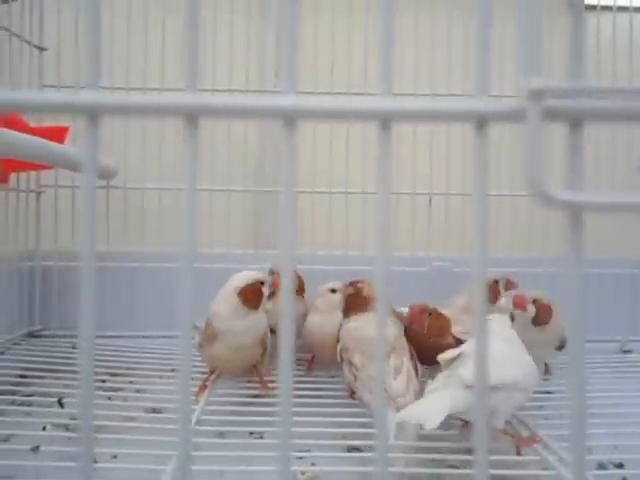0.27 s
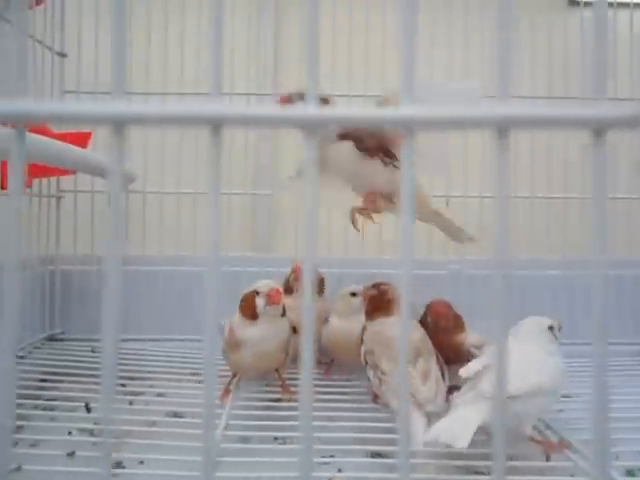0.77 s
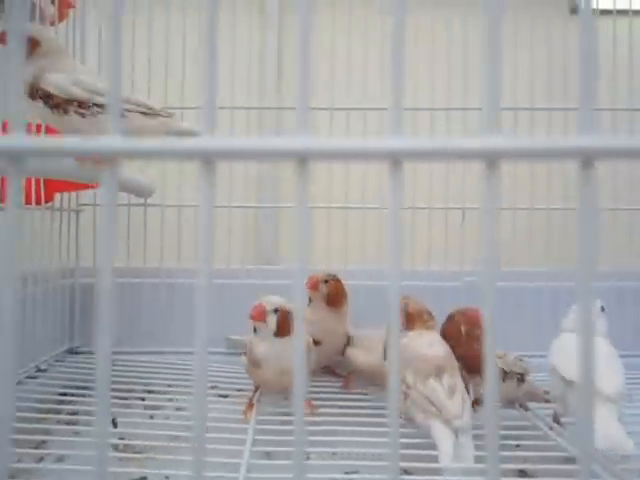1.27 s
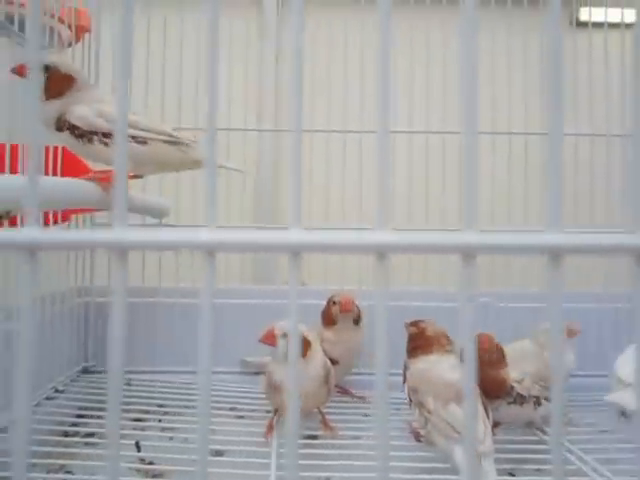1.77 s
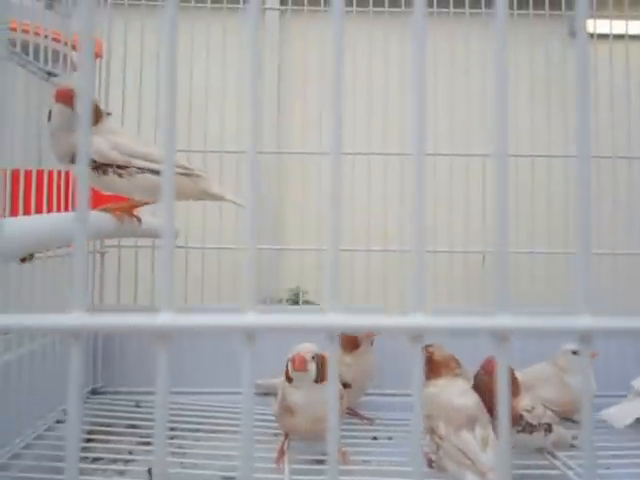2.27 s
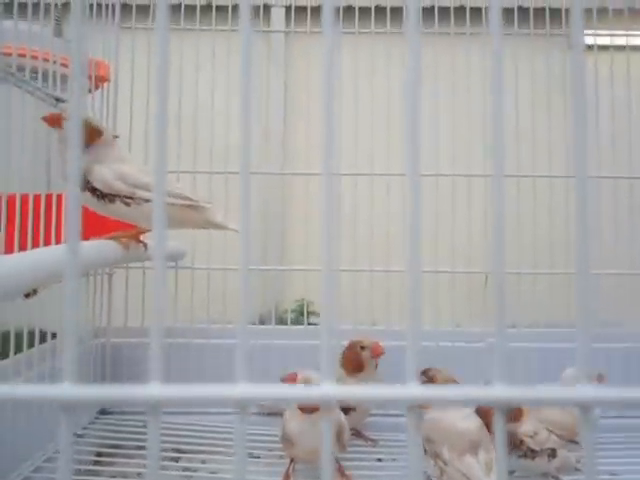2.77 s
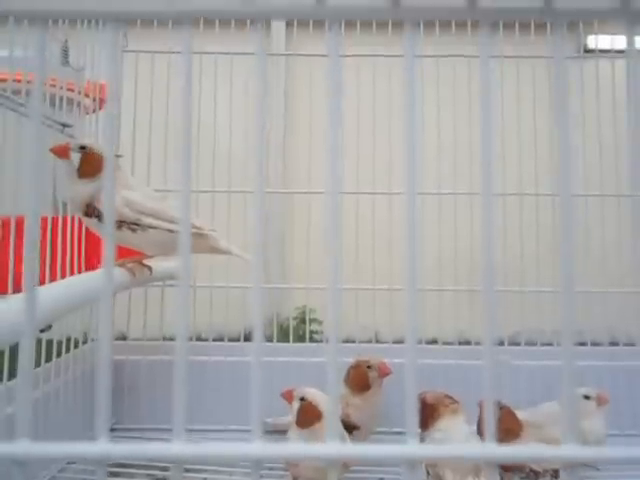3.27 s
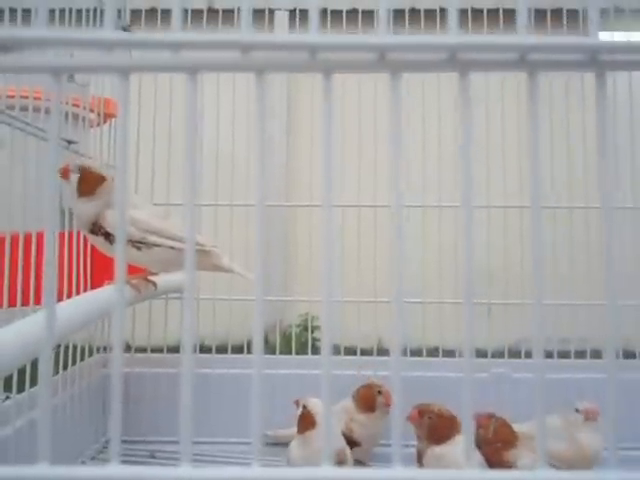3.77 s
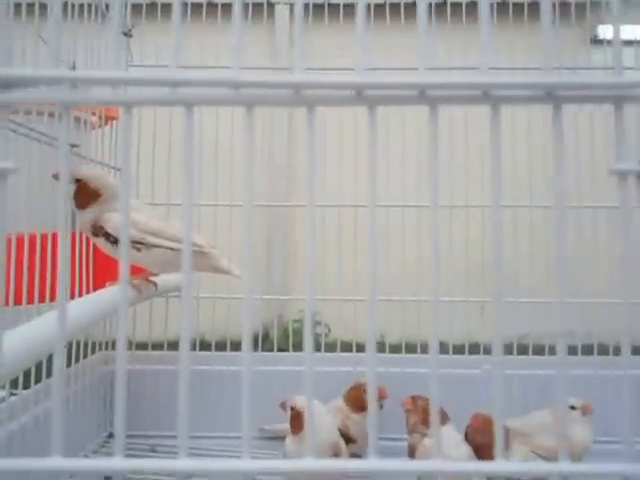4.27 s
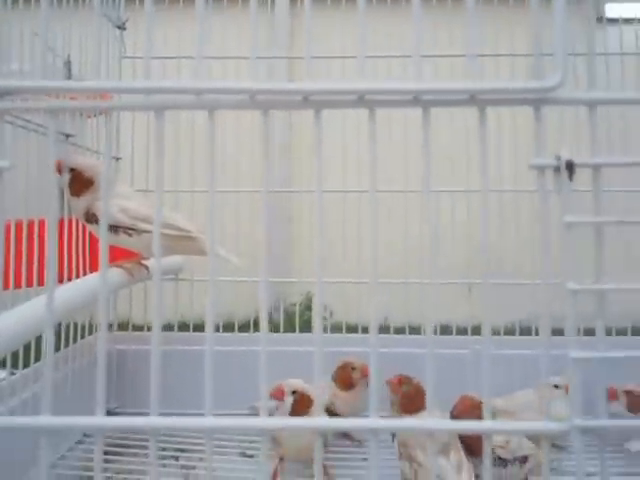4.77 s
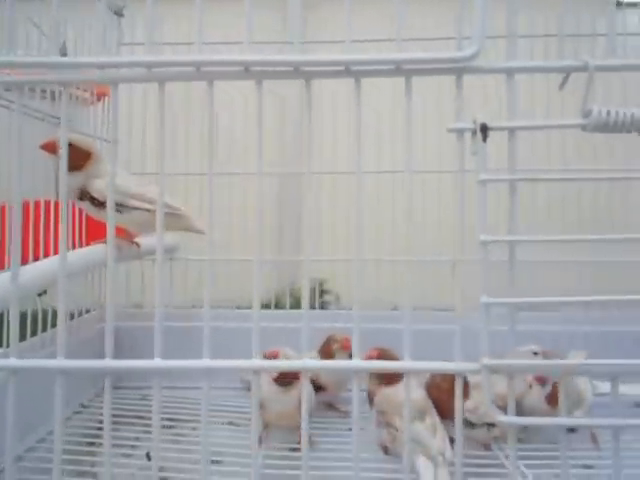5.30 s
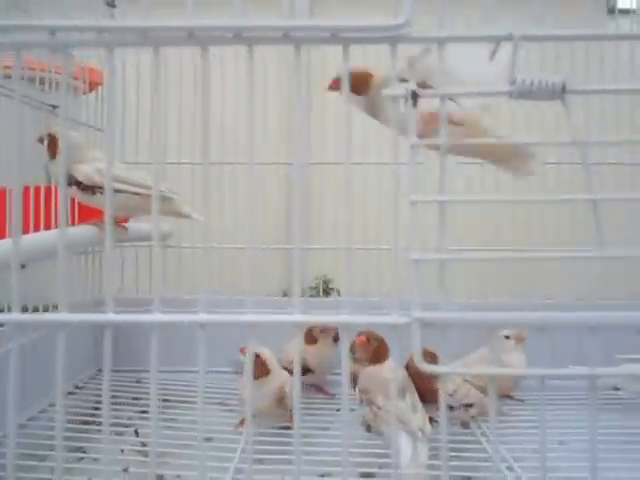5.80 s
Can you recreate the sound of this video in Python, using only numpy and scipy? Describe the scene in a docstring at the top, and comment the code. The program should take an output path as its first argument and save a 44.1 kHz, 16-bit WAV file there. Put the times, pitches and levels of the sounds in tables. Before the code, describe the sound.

Small caged finches give short, reedy falling calls, with wing flutters and ringing cage wires over a steady low ventilation hum.

```python
"""Finches call in a wire cage close to the microphone: short falling calls, two-part calls, nasal contact
notes, a churr and thin whistles. Each note is a syrinx buzz filtered by the throat and beak.
Hops and wing brushes scratch the wires and set them ringing; wingbeats puff air at the microphone.
Other birds chirp further off in the shop, over the rumble and motor hum of the ventilation."""
import sys
import numpy as np
from scipy import signal
from scipy.fft import rfft, irfft, next_fast_len
from scipy.io import wavfile
from scipy.ndimage import uniform_filter1d

SR = 44100
rng = np.random.default_rng(int(sys.argv[2]) if len(sys.argv) > 2 else 0)


def store_pcm(level_fs):
    """Save levels as 16-bit WAV."""
    pcm = np.round(np.clip(level_fs, -1, 1) * 32767).astype(np.int16)
    wavfile.write(sys.argv[1], SR, np.atleast_2d(pcm).T)


N = 266364

# nasal throat response: freq_hz, gain_db
NASAL_THROAT = [(400, -5.5), (900, 1), (1400, -6.5), (2200, 2.5), (2800, -3.5), (3400, -1.5), (4400, -8),
                (5300, -11)]
# scratch and feather noise spectrum: freq_hz, gain_db
FRICTION_SPECTRUM = [(300, -11.5), (1000, 0.5), (2200, -2), (3800, -5.5), (5300, -12)]


def undb(db):
    """Decibels to gain."""
    return 10 ** (np.asarray(db) / 20)


def unit(x):
    """Scale to rms 1."""
    return x / np.sqrt(np.mean(x ** 2) + 1e-18)


def decay(t, t60_s):
    """Exponential fall, 60 dB in t60_s."""
    return np.exp(-np.log(1000) * t / t60_s)


def add(track, start_s, sound):
    """Mix sound into track at start_s."""
    start = int(np.clip(start_s * SR, 0, N))
    track[start:start + len(sound)] += sound[:N - start]


def wander(size, rate_hz):
    """Smooth random drift, spread near 1."""
    hold = max(int(SR / rate_hz), 1)
    steps = np.repeat(rng.standard_normal(size // hold + 2), hold)
    return uniform_filter1d(steps, hold)[:size] * np.sqrt(3 / 2)


def colour(x, points, tilt_db_per_oct=0):
    """Minimum-phase filter through (freq_hz, gain_db) points, tilted about 3 kHz."""
    size = 2 * next_fast_len(len(x) // 2 + 1024)
    octave = np.log2(np.maximum(np.fft.rfftfreq(size, 1 / SR), 10))
    hz, db = np.transpose(points)
    tilt_db = tilt_db_per_oct * np.clip(octave - np.log2(3000), -3, 1)
    cepstrum = irfft(np.log(undb(np.interp(octave, np.log2(hz), db) + tilt_db)))
    cepstrum[1:size // 2] *= 2
    cepstrum[size // 2 + 1:] = 0
    return irfft(rfft(x, size) * np.exp(rfft(cepstrum)))[:len(x)]


def gesture(stretch, start_hz, hold_hz, glide_s, bend, sag_per_s, attack_s, length_s, release_s,
            scoop, droop, fade_db_per_s, rough, onset_rough, settle_s):
    """Pitch, gain, roughness of a note: pressure builds, pitch glides, both sink at the release."""
    t = np.arange(-attack_s, length_s, 1 / (SR * stretch))  # stretch scales all times
    attack = np.clip(1 + t / attack_s, 0, 1)
    release = np.clip((length_s - t) / release_s, 0, 1)
    held_s = np.maximum(t, 0)
    glide = np.maximum(1 - held_s / glide_s, 0) ** bend
    hz = hold_hz * (start_hz / hold_hz) ** glide * np.exp(-sag_per_s * held_s)
    hz = hz * (1 - scoop * (1 - attack)) * (1 - droop * (1 - release) ** 2)
    onset_db = -2.5 * np.exp(-held_s / 0.0038)
    gain = attack ** 0.96 * release * undb(fade_db_per_s * held_s + onset_db)
    return hz, gain, rough + onset_rough * np.exp(-held_s / settle_s)


def note(shape, throat, stretch, pitch_ratio, tilt_db_per_oct, jitter=0.083, waver=0.0031):
    """The syrinx buzzes through the throat; when rough, cycles go uneven and air hisses with each."""
    hz, gain, rough = gesture(stretch, **shape)
    size = len(hz)
    hz = hz * pitch_ratio * (1 + jitter * rough * wander(size, 900) + waver * wander(size, 130))
    phase = 2 * np.pi * np.cumsum(hz) / SR
    buzz = np.sqrt(2) * sum(np.cos(k * phase) * (k * hz < SR / 2) for k in range(1, 16))
    hiss = 2 * rough * (1 + np.cos(phase)) * rng.standard_normal(size)
    return colour(np.pad((buzz + hiss) * gain, (0, 256)), throat, tilt_db_per_oct)


def perch(sound):
    """Close reflections, different at each spot, lift some harmonics and thin others."""
    # tray and back wall: extra_path_m, gain_db
    reflections = [(0.242, -30), (0.616, -16.5), (1.302, -18.5)]
    direct = np.pad(sound, (0, 512))
    out = direct.copy()
    for extra_path_m, gain_db in reflections:
        lag = int(extra_path_m * rng.uniform(.7, 1.3) / 343 * SR)
        out += undb(gain_db) * np.roll(direct, lag)
    return out


def calls(events, shape, throat, beak_q=6, beak_db=1):
    """One kind of note, repeated with varied pace, pitch, strength and beak resonance."""
    out = np.zeros(N)
    for attack_end_s, stretch, pitch_ratio, level_db, tilt_db_per_oct, beak_hz in events:
        voice = note(shape, throat, stretch, pitch_ratio, tilt_db_per_oct)
        beak = undb(beak_db) * signal.lfilter(*signal.iirpeak(beak_hz, beak_q, fs=SR), voice)
        add(out, attack_end_s - shape["attack_s"] * stretch, undb(level_db) * perch(voice + beak))
    return out


def ventilation(air_db=-27.5, drift_db=0.12):
    """Rumbling air and fan motor hum."""
    # air noise: freq_hz, density_db
    air_spectrum = [(12, -34), (20, -8), (43, 3.5), (133, -6.5), (173, -11.5), (229, -14), (420, -20),
                    (1050, -26), (1360, -31), (1490, -32), (2380, -36.5), (2940, -36), (3460, -39.5),
                    (4800, -42), (5400, -42.5), (7020, -85.5), (11900, -120)]
    # motor tones: freq_hz, level_db, unsteadiness
    motor_tones = [(57.4, -38, 0.78), (120, -31, 0.17), (236.2, -46, 0.19)]
    t = np.arange(N) / SR
    air = unit(colour(rng.standard_normal(N), air_spectrum)) * undb(air_db - drift_db * wander(N, 12))
    hum = np.zeros(N)
    for hz, level_db, unsteadiness in motor_tones:
        gain = undb(level_db) * np.sqrt(2) * (1 + unsteadiness * wander(N, 6.5) / 2)
        hum += gain * np.sin(2 * np.pi * hz * t + unsteadiness * wander(N, 4))
    return air + hum


def contact_calls():
    """Soft, rough nasal notes."""
    # low arching note: gesture() arguments
    shape = dict(start_hz=437, hold_hz=492, glide_s=.04, bend=1.5, sag_per_s=0.88, attack_s=.016, length_s=0.089, release_s=0.026, scoop=.08, droop=0.33, fade_db_per_s=-5.5, rough=0.21, onset_rough=0.36, settle_s=0.0083)
    # attack_end_s, stretch, pitch_ratio, level_db, tilt_db_per_oct, beak_hz
    events = [(.108, 0.77, 1.06, -42, 0.5, 2500), (.863, 0.73, 0.92, -47, -1, 3120),
              (1.781, 1.54, 0.99, -47, 1, 3260), (1.962, 1.12, 1, -44, -0.5, 920),
              (4.772, 1, 1.01, -46.5, -1, 2430), (5.688, 1.1, 0.83, -45, 1.2, 2990)]
    return calls(events, shape, NASAL_THROAT, beak_db=-5.5)


def cage_wires(looseness_rad=1.25, contact_s=0.0016):
    """Each touch scratches and leaves the wires ringing, unsteady in their loose joints."""
    # feet, beaks and brushing wings on the wires:
    # start_s, ring_db, tilt_db_per_oct, scratch_db, scratch_t60_s
    touches = [(0.234, -62, -10, -34.5, 0.16), (.399, -30, -2.5, -37.5, 0.17),
               (0.692, -37.5, -2.5, -29, 0.071), (.765, -54, -3.5, -35.5, 0.45),
               (.803, -37, -12, -31.5, 0.23), (0.996, -36, -7, -32, 0.075), (1.5, -50, -2.5, -33.5, 0.1),
               (2.561, -37.5, -7, -46, .08), (2.602, -32, -1, -34, 0.18), (5.106, -58.5, -14, -23.5, 0.045)]
    # wire modes: freq_hz, level_db, t60_s
    wire_modes = [(800, -8, .5), (975, -2.5, 0.98), (1032, -8, 0.4), (1005, -6, 1), (1048, -3, 0.76),
                  (1911, -7.5, 0.28), (2010, -20, 0.42), (3180, -17, 0.33), (4780, -1.5, 0.16)]
    out, t = np.zeros(N), np.arange(SR) / SR
    attack = 1 - np.exp(-t / contact_s)
    for start_s, ring_db, tilt_db_per_oct, scratch_db, scratch_t60_s in touches:
        ring = np.zeros(SR)
        for hz, level_db, t60_s in wire_modes:
            gain = undb(level_db + tilt_db_per_oct * np.log2(hz / 975)) * decay(t, t60_s)
            ring += gain * np.sin(2 * np.pi * (hz * t + rng.random()) + looseness_rad * wander(SR, 90))
        scratch = unit(colour(rng.standard_normal(SR), FRICTION_SPECTRUM)) * decay(t, scratch_t60_s)
        add(out, start_s, (undb(ring_db) * ring + undb(scratch_db) * scratch) * attack)
    return out


def wings(eddies=0.67, feather_db=-28):
    """Uneven wingbeats puff air at the microphone, with a faint brush of feathers."""
    # start_s, length_s, beat_hz, level_db
    flights = [(0.802, 0.2, 24.3, -11), (5.768, 0.31, 23.3, -12.5)]
    out = np.zeros(N)
    for start_s, length_s, beat_hz, level_db in flights:
        size = int(length_s * SR)
        beat = np.sin(2 * np.pi * np.cumsum(beat_hz * (1 + 0.11 * wander(size, 27))) / SR)
        brush = unit(colour(rng.standard_normal(size), FRICTION_SPECTRUM, tilt_db_per_oct=-11))
        feathers = undb(feather_db) * np.maximum(beat, 0) ** 2 * brush
        puffs = unit(beat * (1 + eddies * wander(size, 110)) + eddies * wander(size, 40))
        add(out, start_s, undb(level_db) * np.hanning(size) * (puffs + feathers))
    return out


def far_birds(rasp=0.61):
    """Thin glides from other cages, some pure, some quavering."""
    # start_s, length_s, start_hz, end_hz, level_db, quaver_ratio
    chirps = [(0.957, 0.034, 4450, 4850, -42, 0.032), (3.123, 0.013, 3370, 3800, -41, .005),
              (3.23, 0.035, 3130, 3310, -43.5, .005), (4.839, 0.034, 3570, 2990, -32.5, 0.011),
              (4.863, 0.023, 3470, 3250, -37, 0.013), (4.885, 0.04, 2694, 3020, -31, .008),
              (4.925, 0.04, 3460, 3670, -36, 0.033), (4.939, 0.03, 2700, 2440, -38, .03),
              (5.236, 0.057, 2900, 4690, -39.5, 0.13), (5.323, 0.051, 2890, 4490, -37, 0.21),
              (5.43, 0.081, 2880, 3950, -40.5, 0.13)]
    out = np.zeros(N)
    for start_s, length_s, start_hz, end_hz, level_db, quaver_ratio in chirps + twitter():
        size = int(length_s * SR)
        hz = np.linspace(start_hz, end_hz, size) * (1 + quaver_ratio * wander(size, 600))
        envelope = np.sqrt(2 * np.hanning(size)) * (1 + rasp * wander(size, 900))
        add(out, start_s, undb(level_db) * envelope * np.sin(2 * np.pi * np.cumsum(hz) / SR))
    return out


def twitter(step_s=0.022, note_s=0.02, pitch_spread=.12, quaver_ratio=.035, scatter_db=2.2):
    """Chirp rows for faint strings of little glides, up or down at random."""
    # start_s, length_s, pitch_hz, level_db
    bouts = [(1.007, .05, 3560, -44.5), (3.05, .17, 3626, -48)]
    chirps = []
    for start_s, length_s, pitch_hz, level_db in bouts:
        for onset_s in np.arange(start_s, start_s + length_s, step_s):
            start_hz, end_hz = pitch_hz * np.exp(pitch_spread * rng.standard_normal(2))
            note_db = level_db + scatter_db * rng.standard_normal()
            chirps.append((onset_s, note_s, start_hz, end_hz, note_db, quaver_ratio))
    return chirps


def short_calls():
    """Reedy notes that start rough and fall in pitch."""
    # falling note: gesture() arguments
    shape = dict(start_hz=1121, hold_hz=618.6, glide_s=.046, bend=1.1, sag_per_s=0.98, attack_s=.016, length_s=0.086, release_s=.018, scoop=.4, droop=.1, fade_db_per_s=-91, rough=0.041, onset_rough=1, settle_s=0.0041)
    # freq_hz, gain_db
    reedy_throat = [(300, -32), (600, -13.5), (1050, -7.5), (1600, -17.5), (2300, -13), (2900, -4.5),
                    (3500, -3.5), (4000, -11), (4600, -6), (5300, -20)]
    # attack_end_s, stretch, pitch_ratio, level_db, tilt_db_per_oct, beak_hz
    events = [(1.373, 0.95, 1, -19.5, -.5, 3580), (2.516, 1.01, 0.99, -19.5, -1, 3430),
              (4.322, .95, 0.97, -23.5, -0.5, 933), (5.778, 1.05, .99, -17.5, 2.5, 2850),
              (5.934, 0.87, 0.91, -16.5, 6.5, 3100)]
    return calls(events, shape, reedy_throat)


def churr(start_s=1.5525, end_s=1.93, rate_hz=60.2, ramp_s=0.5475, pitch_scatter=0.045, scatter_db=1.4):
    """Scolding rattle of hoarse chips, louder and slightly higher as effort builds; stops mid-ramp."""
    # one chip: gesture() arguments
    shape = dict(start_hz=1540, hold_hz=1476, glide_s=.008, bend=0.94, sag_per_s=2, attack_s=0.0022, length_s=0.013, release_s=0.0067, scoop=0.22, droop=.05, fade_db_per_s=-1000, rough=0.48, onset_rough=.1, settle_s=0.0023)
    out = np.zeros(N)
    for onset_s in np.arange(start_s, end_s, 1 / rate_hz):
        effort = ((onset_s - start_s) / ramp_s) ** 1.6
        pitch_ratio = (0.98 + 0.05 * effort) * (1 + pitch_scatter * rng.standard_normal())
        level_db = -38.5 + 17 * effort - scatter_db * rng.standard_normal()
        chip = note(shape, NASAL_THROAT, stretch=0.88, pitch_ratio=pitch_ratio, tilt_db_per_oct=-2)
        add(out, onset_s, undb(level_db) * chip)
    return out


def two_part_calls():
    """A brief lead-in, then a longer brassy fall."""
    # the two notes: gesture() arguments
    lead_shape = dict(start_hz=751, hold_hz=788.6, glide_s=0.014, bend=1.9, sag_per_s=0.97, attack_s=0.0042, length_s=0.041, release_s=.013, scoop=0.055, droop=.07, fade_db_per_s=-48.5, rough=0.04, onset_rough=0.13, settle_s=.003)
    fall_shape = dict(start_hz=1105, hold_hz=448, glide_s=.068, bend=1.35, sag_per_s=.1, attack_s=.005, length_s=0.11, release_s=0.016, scoop=0.093, droop=0.22, fade_db_per_s=-100, rough=0.031, onset_rough=0.51, settle_s=0.0025)
    # freq_hz, gain_db
    brassy_throat = [(400, -28.5), (900, -14.5), (1350, -18), (1800, -9.5), (2250, -5), (2700, -4.5),
                     (3100, -1.5), (3500, -4.5), (4050, -1), (4500, -14), (4900, -16.5), (5300, -21)]
    # attack_end_s, stretch, pitch_ratio, level_db, tilt_db_per_oct, beak_hz
    lead_events = [(2.244, 0.89, .91, -30, 0.88, 1970), (3.900, 0.88, 1.005, -29, 1.1, 3120),
                   (4.988, 0.9, .99, -23.5, 0.5, 4470), (5.897, 0.75, 1.015, -24.5, 2.2, 4593)]
    fall_events = [(2.289, 0.99, 1, -19.5, 0.43, 2570), (3.948, 1, 1, -24.5, 1, 3000),
                   (5.034, 1.02, 0.98, -20, 0.5, 3430), (5.947, 1.05, 1.02, -23, 0.81, 3200)]
    falls = calls(fall_events, fall_shape, brassy_throat, beak_q=5, beak_db=-3.5)
    return falls + calls(lead_events, lead_shape, brassy_throat)


def whistles():
    """Thin, high notes within the two-part calls, strongest at the second harmonic."""
    # swelling note: gesture() arguments
    shape = dict(start_hz=2442, hold_hz=2466, glide_s=0.026, bend=1.1, sag_per_s=.05, attack_s=.007, length_s=.036, release_s=.006, scoop=0.027, droop=.01, fade_db_per_s=112, rough=.025, onset_rough=.03, settle_s=.003)
    # freq_hz, gain_db
    thin_throat = [(1000, -30.5), (2450, -5.5), (3500, -4), (4800, 4.5), (5400, 1)]
    # attack_end_s, stretch, pitch_ratio, level_db, tilt_db_per_oct, beak_hz
    events = [(2.277, 0.23, 0.86, -30.5, -2.1, 4300), (3.936, 0.13, 0.87, -34, -1.3, 4150),
              (5.024, 0.12, .9, -30.5, -1.1, 4340), (5.901, 1, 1, -25.5, 0.17, 4860),
              (5.982, 1.6, 1.005, -38, 0, 4900)]
    return calls(events, shape, thin_throat)


def shop_echo(x, t60_s=0.7, build_s=.008):
    """Diffuse echo of the room."""
    t = np.arange(SR) / SR
    tail = rng.standard_normal(SR) * decay(t, t60_s) * (1 - np.exp(-t / build_s))
    return signal.fftconvolve(x, unit(tail) / np.sqrt(SR))[:N]


def scene():
    """Near birds almost dry; far birds carry more of the room."""
    near = short_calls() + two_part_calls() + contact_calls() + whistles() + churr() + cage_wires()
    far = far_birds()
    echo = shop_echo(undb(-26) * near + undb(-1.5) * far)
    return (near + far + echo + wings() + ventilation())[None]


def record(dry, sampling_hz=11025, band_hz=5450, top_hz=7300, fade_s=.004):
    """Slow sampling; a gentle output filter lets the top notes mirror above 5.5 kHz."""
    step = round(SR / sampling_hz)
    band = signal.sosfiltfilt(signal.butter(12, band_hz, fs=SR, output="sos"), dry)
    samples = band * step * (np.arange(N) % step == 0)
    output_filter = signal.firwin(65, band_hz, window=("kaiser", 9), fs=SR)
    smooth = signal.fftconvolve(samples, output_filter[None], mode="same")
    fade_out = np.minimum(np.arange(N)[::-1] / (fade_s * SR), 1)
    return signal.sosfilt(signal.ellip(8, .2, 70, top_hz, fs=SR, output="sos"), smooth * fade_out)


dry = scene()
out = record(dry)
store_pcm(out)
```